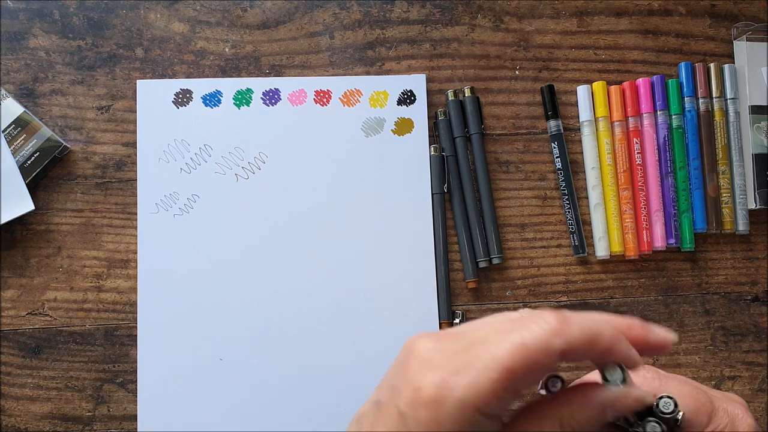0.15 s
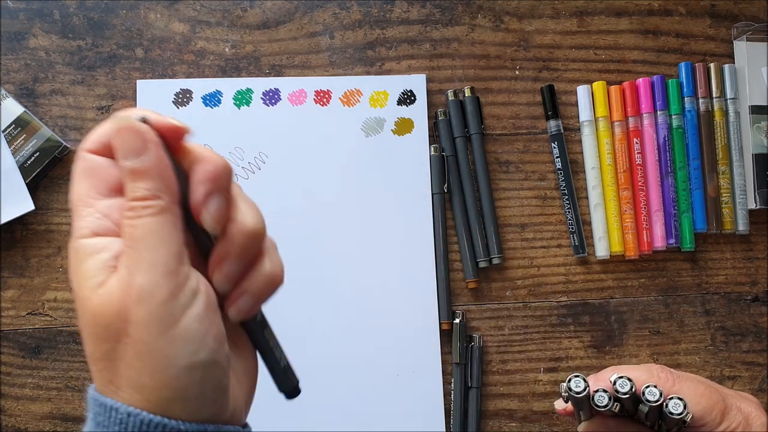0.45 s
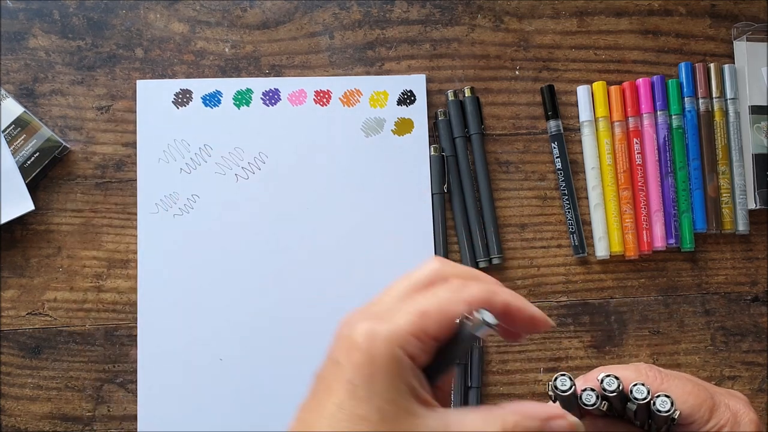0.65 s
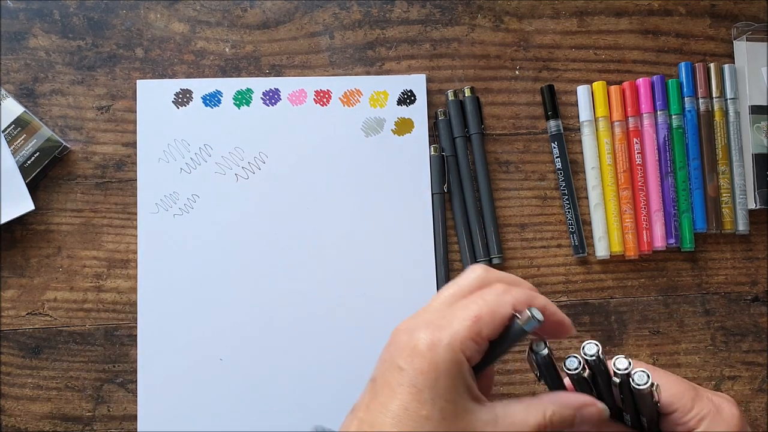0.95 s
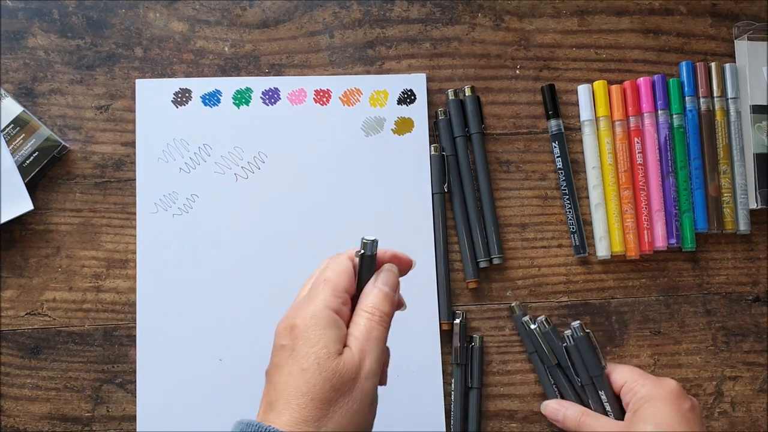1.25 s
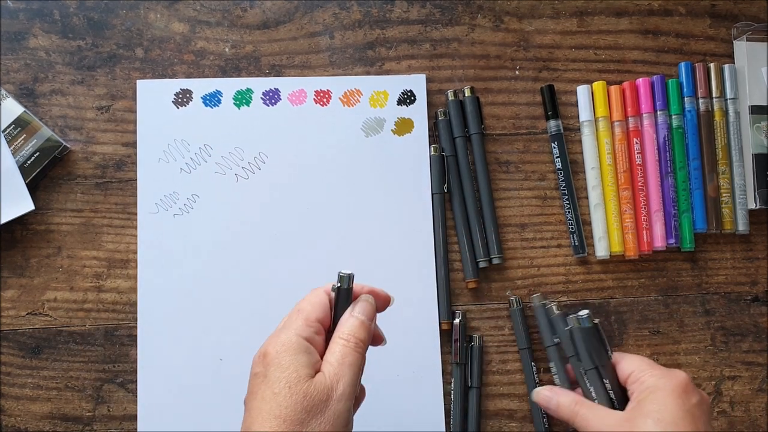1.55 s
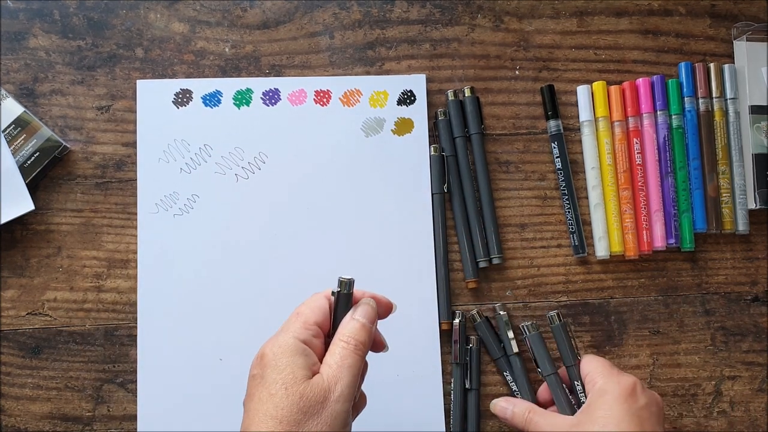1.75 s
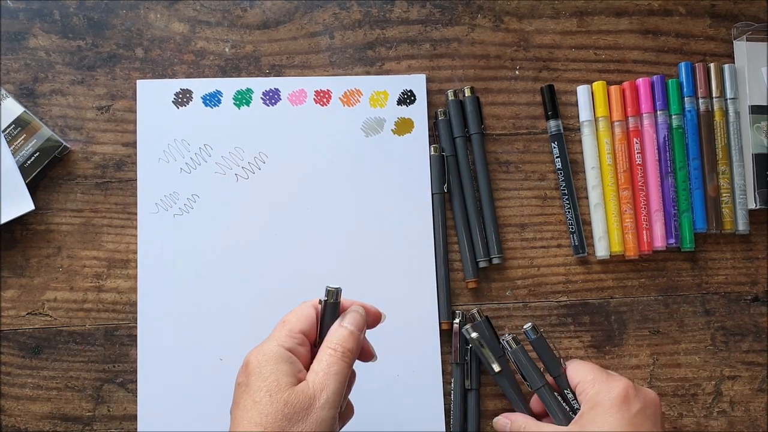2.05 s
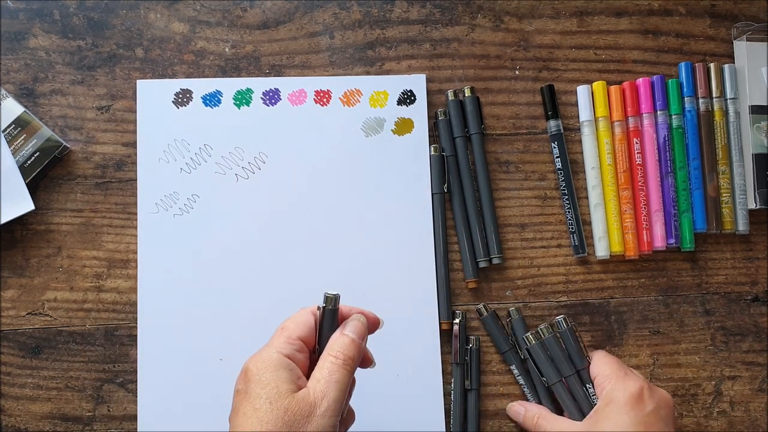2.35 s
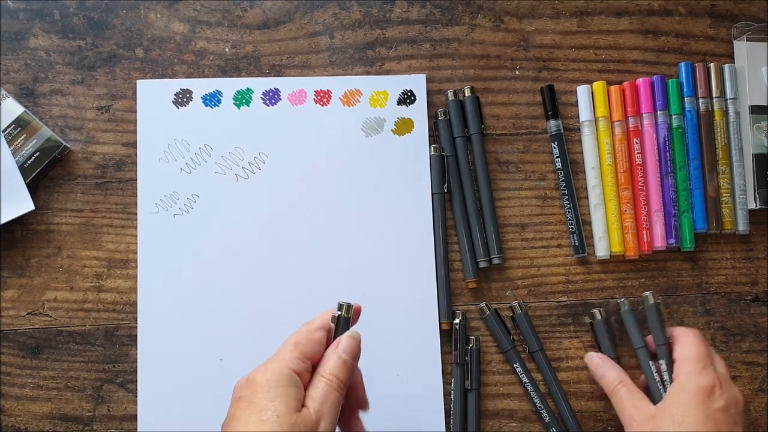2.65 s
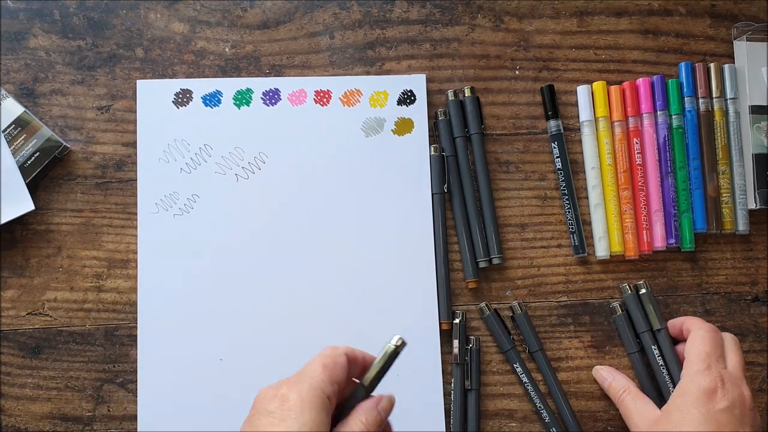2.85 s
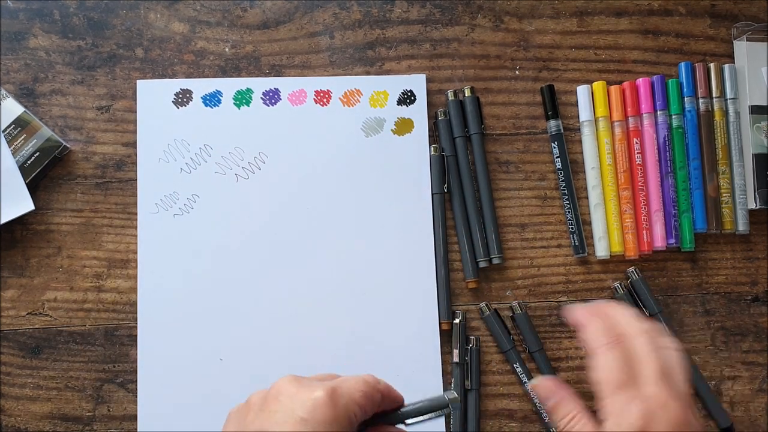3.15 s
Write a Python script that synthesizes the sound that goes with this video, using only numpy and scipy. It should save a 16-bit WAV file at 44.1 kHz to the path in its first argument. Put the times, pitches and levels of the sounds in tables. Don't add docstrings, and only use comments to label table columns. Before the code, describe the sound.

Plastic pens click and clatter against each other, with a few knocks on a wooden tabletop.

```python
import sys
import numpy as np
from scipy import signal
from scipy.fft import rfft, irfft
from scipy.io import wavfile
from scipy.ndimage import uniform_filter1d

SR = 44100
rng = np.random.default_rng(int(sys.argv[2]) if len(sys.argv) > 2 else 0)


def persist_wave(psi):
    counts = np.round(np.clip(psi, -1, 1) * 32767).astype(np.int16)
    wavfile.write(sys.argv[1], SR, np.atleast_2d(counts).T)


def ratio_of_db(decibels):
    return 10 ** (np.asarray(decibels, float) / 20)


N = 145530


def read(points, hz):
    f, value = np.transpose(points)
    return np.interp(np.log(hz + 1), np.log(f + 1), value)


def evened(x):
    return x / np.sqrt(np.mean(x ** 2) + 1e-20)


def add(mix, s, sound):
    part = mix[round(s * SR):][:len(sound)]
    part += sound[:len(part)]


def ring(t, hz, db, t60, turn=0):
    return ratio_of_db(db - 60 * t / t60) * np.sin(2 * np.pi * (hz * t + turn))


def steady(shape, level_db, patchy_db):
    hz = np.fft.rfftfreq(2048, 1 / SR)
    real, imag, patches = rng.standard_normal((N // 512 + 5, 1025, 3)).T
    patches = uniform_filter1d(patches, size=8, axis=0)
    patches = evened(uniform_filter1d(patches, size=8, axis=1))
    inside = (hz > shape[0][0] * 0.8) & (hz < shape[-1][0])
    level = ratio_of_db(read(shape, hz)[:, None] + patchy_db * patches) * inside[:, None]
    noise = signal.istft((real + 1j * imag) * level, nperseg=2048, noverlap=1536)[1][:N]
    return ratio_of_db(level_db) * evened(noise)


# f/Hz, density/dB per Hz
RUMBLE = [(30, -20), (45, -13), (68, -7.5), (120, -5), (260, -9.5), (390, -18.5), (700, -34.5)]


def rumble():
    return steady(RUMBLE, -60.5, patchy_db=2.5)


# f/Hz, density/dB per Hz
HISS = [(700, -2), (1590, -3), (2560, -7), (3900, -6), (4900, 0), (7460, 4), (11000, -2), (13000, -7),
        (16500, 2)]


def hiss():
    return steady(HISS, -67.5, patchy_db=-1.0)


def slow_wander(t):
    return evened(sum(np.sin(2 * np.pi * (f * t + rng.random())) for f in np.geomspace(0.5, 7, 9)))


def hum():
    t = np.arange(N) / SR
    level_db = -57 + 3 * slow_wander(t)
    hz = 51 + 1.9 * slow_wander(t)
    return ratio_of_db(level_db) * np.sin(2 * np.pi * np.cumsum(hz) / SR)


# f/Hz, t60/s
WALLS = [(150, 0.64), (700, 0.2), (1800, 0.26), (5000, 0.22), (12800, 0.14)]
# t/s (delay), level/dB
ECHOES = [(.0014, -44.5), (.0031, -27), (.0043, -19)]


def room(direct, spread, wet_db):
    early_db, early_t60 = 3, 0.025
    out = direct.copy()
    turn = 2 * np.pi * 7.3 * np.arange(N) / SR
    for delay, db in ECHOES:
        add(out, delay, ratio_of_db(db) * direct)
    for k in range(3):
        taps = np.zeros(SR // 2)
        at = np.arange(40, SR // 2 - 10, 10)
        taps[at + rng.integers(0, 10, len(at))] = rng.choice([-1., 1.], len(at))
        hz, t, bands = signal.stft(taps, SR, nperseg=256)
        early = 1 + ratio_of_db(early_db - 60 * t / early_t60)
        decay = ratio_of_db(-60 * t / read(WALLS, hz)[:, None])
        tail = signal.istft(bands * early * decay, SR, nperseg=256)[1]
        tail[:40] = 0
        tail = tail / np.linalg.norm(tail)
        share = np.sqrt(2 / 3) * np.cos(turn + k * np.pi / 3)
        out += ratio_of_db(wet_db) * signal.fftconvolve(spread * share, tail)[:N]
    return out


def rub(length, db, hz, width_hz):
    n = round(length * SR)
    roughness = uniform_filter1d(rng.exponential(1, SR // 2) ** 2, size=30)
    grain = rng.standard_normal(SR // 2) * ratio_of_db(2.9 * roughness)
    f = np.fft.rfftfreq(SR // 2, 1 / SR)
    resonance = 1 / (1 + (2 * (f - hz) / width_hz) ** 4)
    low_cut = f / (f + 0.14 * hz)
    x = irfft(rfft(grain) * resonance * low_cut)[:n]
    swell = np.sin(np.pi * np.arange(len(x)) / n) ** 1.2
    return ratio_of_db(db) * evened(x) * swell


# t/s, length/s, level/dB, f/Hz (centre), width/Hz
RUBS = [
    (0.076, 0.072, -63.5, 7000, 7020),
    (0.148, 0.073, -45, 6740, 10100),
    (0.177, 0.17, -59.5, 7000, 11880),
    (0.267, 0.033, -39, 6343, 7450),
    (0.41, 0.21, -63.5, 7460, 7020),
    (0.946, 0.45, -68, 380, 600),
    (0.323, 0.24, -71.5, 717.6, 1091),
    (2.879, 0.058, -52, 6340, 5481),
    (3.029, 0.07, -39, 5574, 8856),
    (3.083, 0.08, -49.5, 6000, 6200),
]
# t/s, length/s, level/dB, f/Hz (centre), width/Hz
SLIDES = [
    (1.93, .2, -69, 430, 50),
    (2.32, .14, -59, 1600, 3400),
    (2.33, .12, -61, 840, 110),
    (2.35, .08, -63, 1540, 90),
    (2.48, .14, -64, 2200, 4000),
    (2.51, .16, -70, 1530, 90),
    (2.63, .045, -61, 2600, 200),
    (2.995, .085, -50, 2600, 600),
    (3.0, .07, -57, 900, 1600),
    (3.045, .03, -50, 4400, 900),
]


def friction():
    out = np.zeros(N)
    for s, *settings in RUBS + SLIDES:
        add(out, s, rub(*settings))
    return out


def push(t, hz, db, lag_s, width_s, turn):
    late = t - lag_s
    return ratio_of_db(db) * np.exp(-(late / width_s) ** 2) * np.sin(2 * np.pi * (hz * late + turn))


# f/Hz, level/dB, t60/s
BOARD_LOW = [(114.5, -15.5, 0.18), (228.5, -8, 0.091), (381.5, -21, 0.017), (421.4, -15, 0.11),
             (458, -19, 0.086), (512, -29, 0.07)]
# f/Hz, level/dB, t60/s
BOARD_HIGH = [(632, -22, 0.06), (780, -22, 0.05), (841, -16, 0.11), (945, -23, .06), (1090, -23, .06),
              (1200, -19, 0.06), (1259, -21, .06), (1425, -22, 0.04), (1531, -18, 0.08)]


def knock(thud_db, rap_db, luck):
    t = np.arange(SR // 3) / SR
    grain_t60 = 0.076
    low = push(t, 450, 6, lag_s=0.0027, width_s=0.0015, turn=0.491)
    high = push(t, 900, 2, lag_s=0.0029, width_s=0.0006, turn=0.85)
    for (hz, db, t60), place in zip(BOARD_LOW, luck[:, 0]):
        low = low + ring(t, hz, db + 6 * place, t60)
    for (hz, db, t60), (place, turn) in zip(BOARD_HIGH, luck[10:]):
        high = high + ring(t, hz, db + 6 * place, t60, turn)
    for a, turn in luck[20:32]:
        low = low + ring(t, 230 + 320 * a, -19, 0.8 * grain_t60, turn)
    for a, turn in luck[32:]:
        high = high + ring(t, 450 + 2600 * a ** 1.1, -21.5 - 15 * a, grain_t60 * (1.1 - 0.42 * a), turn)
    contact = 1 - np.exp(-t / 0.00095)
    return (ratio_of_db(thud_db) * low + ratio_of_db(rap_db) * high) * contact


# t/s, level/dB (soft thud), level/dB (hard rap)
KNOCKS = [(0.27, -46.5, -40), (1.2706, -20, -24.5), (1.379, -53.5, -46), (1.655, -32.5, -46),
          (1.674, -40, -44), (1.753, -31.5, -37.5), (2.156, -30, -47), (2.182, -30.5, -40),
          (2.212, -26.5, -40), (2.241, -41, -37.5), (2.316, -35.5, -39.5), (2.454, -40.5, -45),
          (2.485, -42, -47.5), (2.607, -41.5, -46), (2.6742, -15.5, -12.5), (2.723, -24, -19),
          (2.7415, -18, -10), (2.88, -43, -41), (3.07, -33, -33.5), (3.081, -30.5, -33), (3.121, -32, -28)]


def knocks():
    out = np.zeros(N)
    for (s, thud_db, rap_db), luck in zip(KNOCKS, rng.random((30, 60, 2))):
        add(out, s, knock(thud_db, rap_db, luck))
    return out


def cap_ring(t, cap_db, cap_hz, luck):
    t60, crack_s = 0.0072, 0.00005
    crack = ratio_of_db(-0.5) * (1 - t / crack_s) * np.exp(-t / crack_s)
    cap = ring(t, cap_hz, 0, t60) - crack
    onset = np.minimum(t / 0.0001, 1)
    for k, (a, turn) in enumerate(luck.reshape(-1, 2)):
        side_hz = 3600 + 800 * (k + a)
        side_db = -4 - 8 * abs(np.log2(side_hz / cap_hz))
        cap = cap + ring(t, side_hz, side_db, t60 * (0.55 + a), turn) * onset
    high_pass = signal.butter(3, 2900, "high", fs=SR, output="sos")
    return ratio_of_db(cap_db - 1) * signal.sosfilt(high_pass, cap)


def barrel_note(t, barrel_db, hz, luck):
    tube_db, tube_t60 = -18.5, 0.093
    wall = ring(t, hz, 0, 0.0096) + ring(t, (1.08 + 0.16 * luck) * hz, -7, 0.015)
    wall = wall + ring(t, hz / 1.127, -19.5, 0.0075)
    tube = ring(t, 0.93 * hz, tube_db, tube_t60) + ring(t, 1.84 * hz, tube_db, tube_t60)
    return ratio_of_db(barrel_db) * (wall + tube)


def all_round(cap_db, cap_hz, barrel_db, hz):
    f = np.fft.rfftfreq(128, 1 / SR) + 1
    high = ratio_of_db(cap_db + 5.5 - 4 * abs(np.log2(f / cap_hz))) / (1 + (3200 / f) ** 4)
    low = ratio_of_db(barrel_db + 10.5) / (1 + ((f - hz) / 1620) ** 2)
    return np.fft.fftshift(irfft(np.hypot(high, low)))


# t/s, level/dB (cap), f/Hz (cap ring), level/dB (barrel), f/Hz (barrel note)
CLICKS_EARLY = [(0.134, -30.5, 8300, -42.5, 3440), (0.1623, -30, 4750, -38.5, 3500),
                (0.2345, -42, 5000, -51, 2440), (0.2718, -24, 9000, -36, 3950),
                (0.2785, -27.5, 9300, -28.5, 3200), (0.2869, -21, 8550, -26.5, 3120),
                (0.2952, -51, 9000, -55, 3000), (0.321, -26.5, 4550, -34.5, 3180),
                (1.26, -35.5, 7300, -36.5, 2670), (1.2708, -21.5, 8450, -16.5, 2910),
                (1.2794, -15.5, 8650, -26.5, 2740), (1.2822, -24.5, 8400, -24.5, 3380),
                (1.3592, -31, 8550, -35.5, 3770), (1.3799, -27, 7400, -26.5, 3130),
                (1.4452, -31, 7550, -33, 3170), (1.4515, -35, 5300, -48, 3690),
                (1.4723, -37, 4700, -39, 3150), (1.4857, -44, 7650, -49.5, 3080),
                (1.5358, -48, 6950, -49, 2360), (1.5507, -47.5, 4550, -45, 3650),
                (1.6123, -40.5, 8600, -47, 2300), (1.6251, -37.5, 7700, -42.5, 2390),
                (1.6466, -38, 8200, -46, 2300), (1.6539, -6.5, 10550, -24, 2920),
                (1.6745, -33, 9150, -31, 2340), (1.682, -30, 9500, -34, 2290),
                (1.7513, -16, 7700, -23.5, 3000), (1.7906, -34, 5800, -41.5, 2020),
                (1.8203, -42, 7150, -41.5, 2080), (1.831, -49, 13350, -55, 1950),
                (1.8835, -22, 10050, -40, 2610)]
# t/s, level/dB (cap), f/Hz (cap ring), level/dB (barrel), f/Hz (barrel note)
CLICKS_LATE = [(2.1565, -15, 7000, -21.5, 2820), (2.1821, -23.5, 5250, -24.5, 3400),
               (2.2099, -25, 10300, -27, 2740), (2.2125, -23.5, 5450, -20.5, 2660),
               (2.2425, -26, 7000, -27.5, 2440), (2.3148, -15, 8270, -35.5, 2670),
               (2.3891, -35, 7860, -47, 2040), (2.4028, -40, 6000, -49, 2140),
               (2.4538, -37.5, 8160, -43.5, 3000), (2.4824, -27.5, 7400, -32, 2760),
               (2.5682, -55, 7300, -67, 2600), (2.6055, -26, 7300, -27, 3070),
               (2.6347, -37, 8900, -45, 2670), (2.6749, -15.5, 6100, -20, 2050),
               (2.7223, -29.5, 10150, -33, 1950), (2.738, -17, 5600, -13, 3090),
               (2.7418, -11, 8500, -11.5, 2480), (2.778, -37, 6040, -51, 2200),
               (2.837, -35.5, 6200, -61, 3420), (2.8473, -29.5, 4640, -30, 3550),
               (2.8786, -23.5, 7260, -28.5, 3800), (2.924, -34.5, 4670, -44.5, 3570),
               (2.9528, -46, 9500, -53, 2980), (3.0339, -19, 11750, -39, 4030),
               (3.0692, -25, 6750, -28, 3120), (3.0802, -13, 4300, -43, 3630),
               (3.0853, -20, 8630, -36, 3480), (3.0894, -25, 8500, -47, 2980),
               (3.119, -27.5, 7700, -50, 3000), (3.1206, -20, 8800, -25, 2730),
               (3.1512, -44, 8000, -52, 2570), (3.1864, -47, 9400, -63, 3430)]


def clicks():
    near, around = np.zeros((2, N))
    t = np.arange(2600) / SR
    for row, luck in zip(CLICKS_EARLY + CLICKS_LATE, rng.random((70, 33))):
        s, cap_db, cap_hz, barrel_db, hz = row
        add(near, s, cap_ring(t, cap_db, cap_hz, luck[3:]) + barrel_note(t, barrel_db, hz, luck[0]))
        add(around, s, all_round(cap_db, cap_hz, barrel_db, hz))
    return near, around


# f/Hz, level/dB
MIC = [(25, -25.5), (40, -13), (50, -5.5), (12000, -3), (14500, -9), (15950, -17), (16250, -42),
       (17000, -55)]


def microphone(x):
    return irfft(rfft(x) * ratio_of_db(read(MIC, np.fft.rfftfreq(N, 1 / SR))), N)


def scene():
    background = rumble() + hiss() + hum()
    board = friction() + knocks()
    near, around = clicks()
    return (room(near, around, wet_db=8) + room(board, board, wet_db=-3) + background)[None]


def band_limit(x):
    return signal.sosfilt(signal.butter(12, 17010, fs=SR, output="sos"), x)


def record(dry):
    return band_limit(microphone(dry))


dry = scene()
out = record(dry)
persist_wave(out)
```